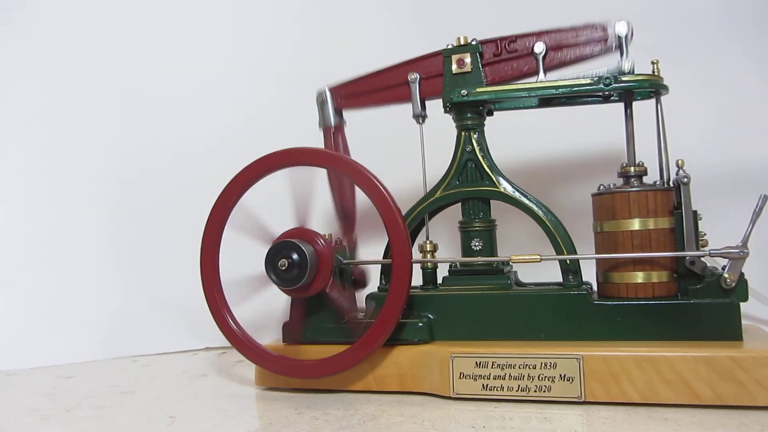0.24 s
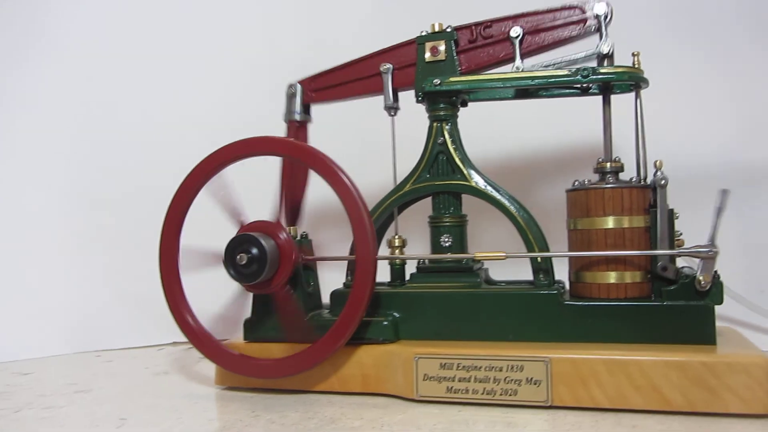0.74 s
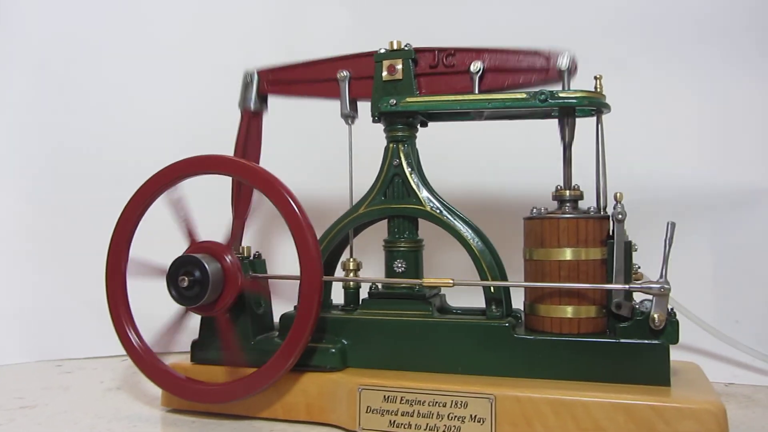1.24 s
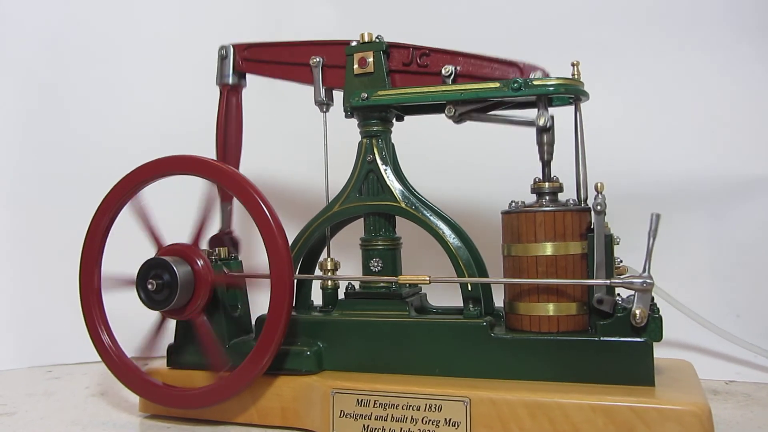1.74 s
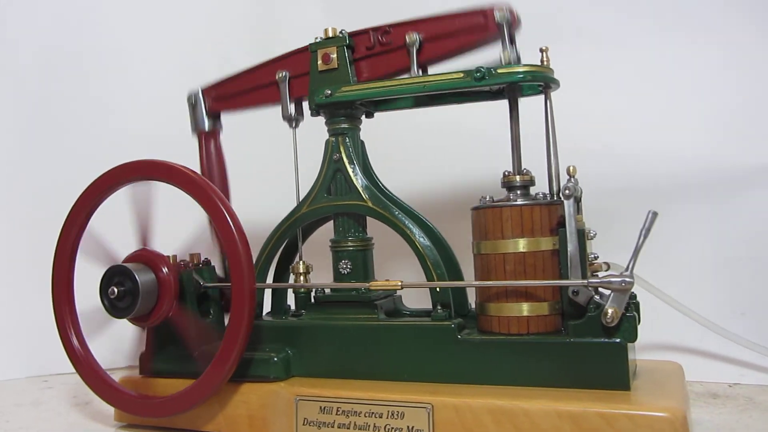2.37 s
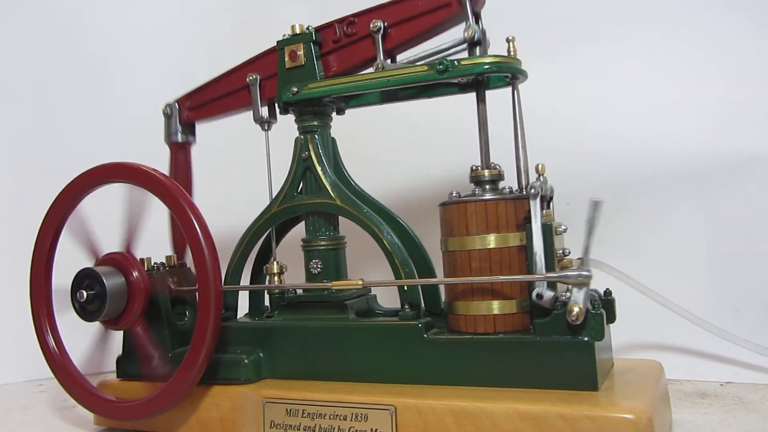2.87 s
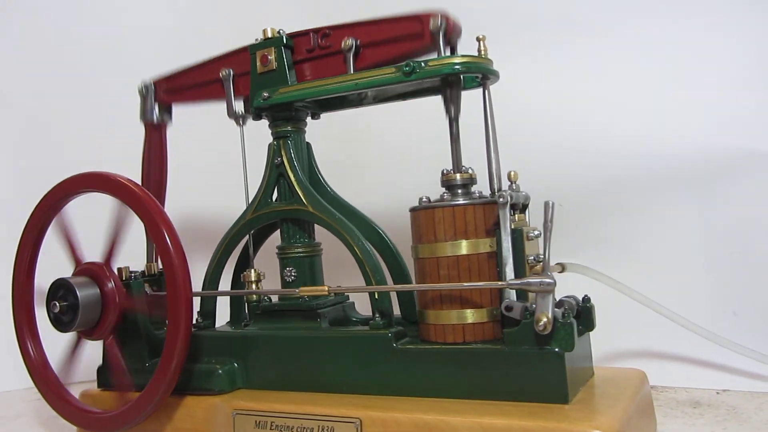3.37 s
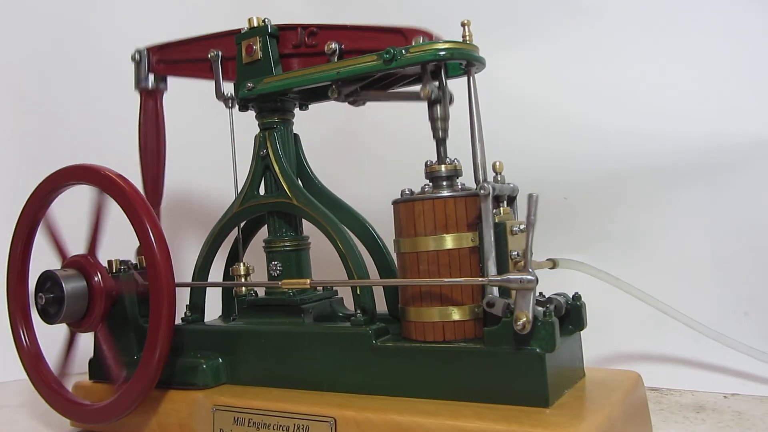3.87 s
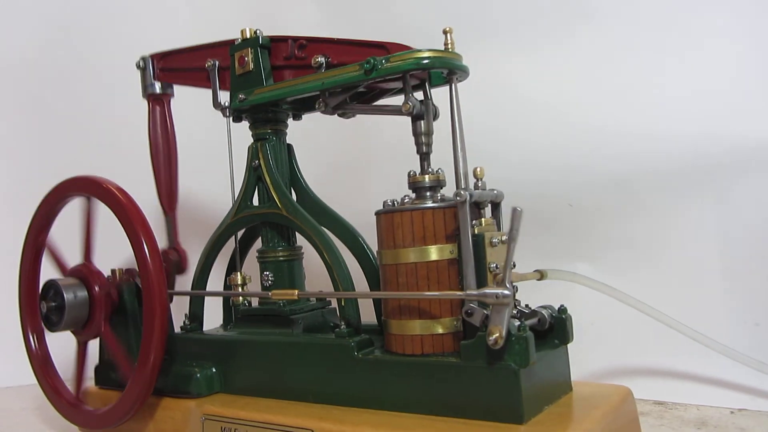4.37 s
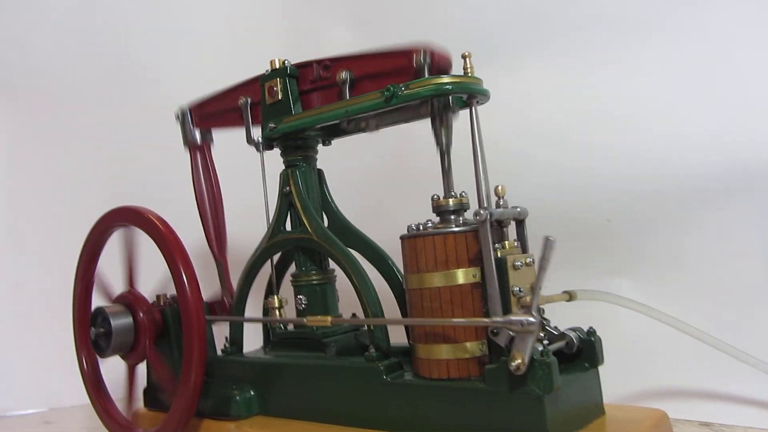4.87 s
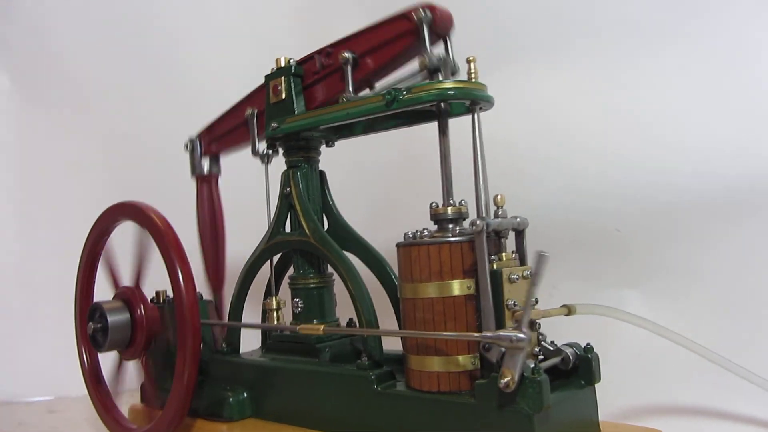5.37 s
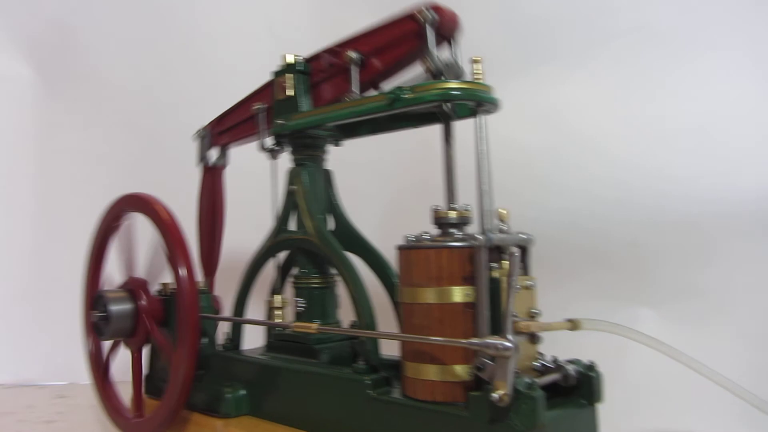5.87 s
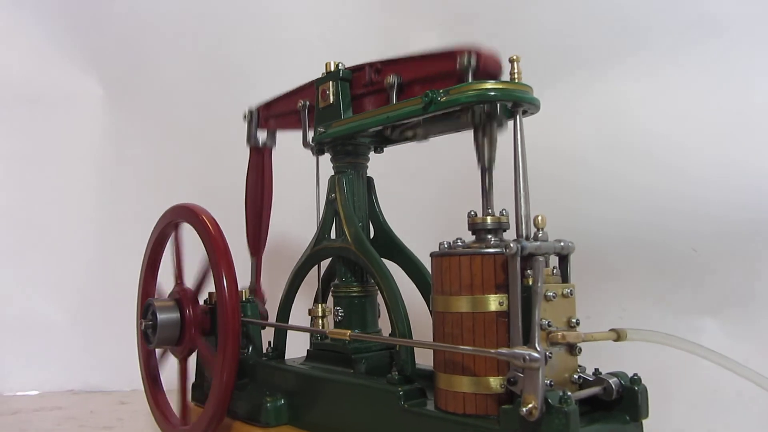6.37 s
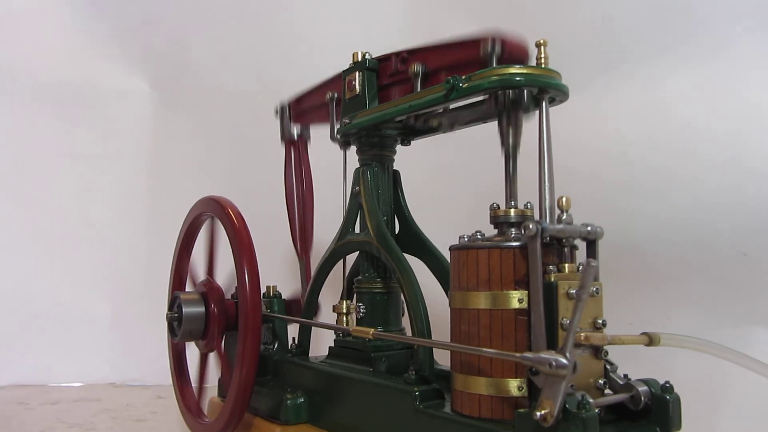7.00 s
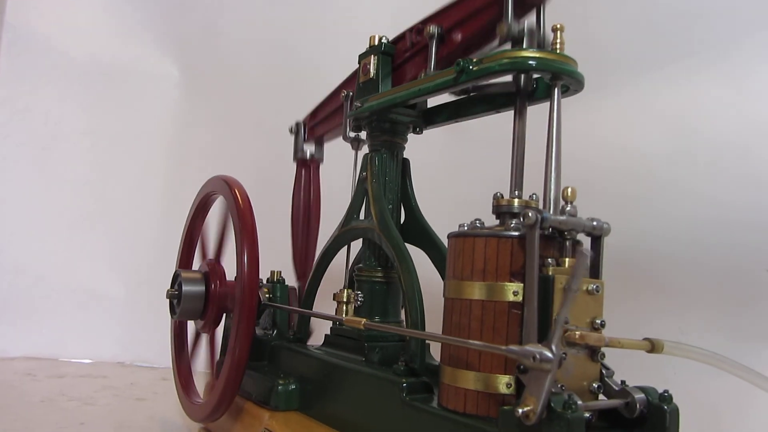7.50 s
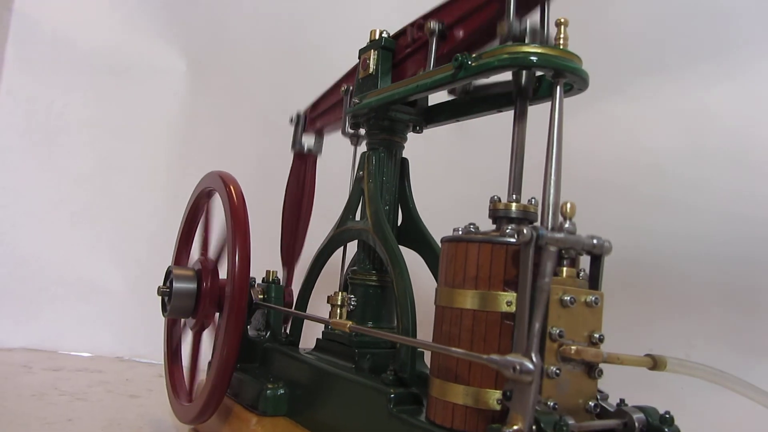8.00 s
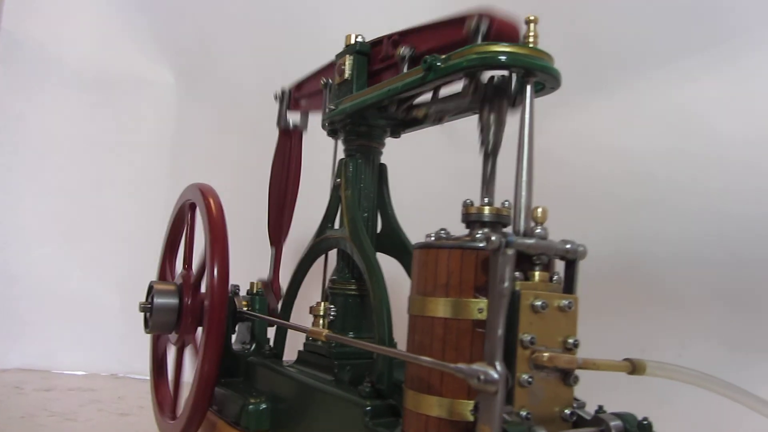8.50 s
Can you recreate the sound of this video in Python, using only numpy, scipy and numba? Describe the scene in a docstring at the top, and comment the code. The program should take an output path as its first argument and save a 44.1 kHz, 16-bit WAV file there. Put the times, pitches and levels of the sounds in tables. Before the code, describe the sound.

Fast, even pairs of sputtering steam-like puffs from a tabletop engine, with light clunks, low rumble and a faint hum in a small room.

```python
"""The exhaust of a model beam engine leads, right of centre: each turn gives a wet, gurgling puff and a
dry hiss, made of sputtering noise, a resonant pipe, a leak and spits. Bearing knocks strike damped modes
of the iron frame and the booming plinth. Under them lie rolling rumble, a faint hum and room noise.
The engine stands on a table in a small room; the stereo microphone creeps nearer, from the front round
to the cylinder end."""
import sys
import numpy as np
from scipy import signal
from scipy.fft import rfft, irfft, next_fast_len
from scipy.io import wavfile
from scipy.ndimage import map_coordinates
from numba import njit

SR = 44100
rng = np.random.default_rng(int(sys.argv[2]) if len(sys.argv) > 2 else 0)


def wav_record(signal):
    """Record a signal, one row per channel, as 16-bit PCM in the file named by sys.argv[1]."""
    frames = np.transpose(np.atleast_2d(signal))
    bounded = np.clip(frames, -1, 1)
    # unit amplitude maps onto the largest positive 16-bit level
    quanta = np.round(bounded * 32767).astype(np.int16)
    wavfile.write(sys.argv[1], SR, quanta)


N = 385434
T = np.arange(N) / SR  # t/s

# Colour of the wet jet, the dry jet and the leak: f/Hz, relative spectral level/dB
WET_HISS = [(500, -19.5), (1100, -20.5), (1600, -10.5), (2100, -3.5), (2950, 0.5), (3600, -5), (5000, -0.5),
            (6200, -1), (8500, -1), (10200, -5.5), (12700, -13.5), (14600, -6.5), (16000, -14)]
DRY_HISS = [(500, -32), (1100, -25), (1600, -11), (2050, -8), (2450, -17.5), (2950, -4.5), (3600, -7.5),
            (5000, -4), (6600, 0), (8600, -2.5), (10500, -7), (12600, -16), (14700, -8), (16000, -17)]
LEAK = [(700, -6), (1500, -15), (2700, -3), (3900, -16), (5500, -4.5), (8500, 2.5), (10500, 0.5),
        (12700, -5), (14500, -7), (16000, -18)]
# Flow out of each end of the cylinder, and the drive of the pipe on each puff:
# opening t/s into the turn, attack/s, open time/s, first burst/dB, sag by closing/dB, release/(dB per s)
WET_PUFF = (0.00074, .035, 0.14, 2.63, 1.4, 404)
DRY_PUFF = (0.19, 0.036, 0.16, 0.53, 10.1, 340)
GURGLE_PUFF = (0.01, 0.07, 0.1053, 0.2, 2.2, 413)
DRY_RING_PUFF = (0.19, 0.016, 0.14, .5, .5, 440)
BURST_S = 0.019  # time constant of the first burst, whose level in dB falls to 1/e
# Condensate rings the pipe at a pitch that shoots up as the valve opens, then sinks
GURGLE_START_HZ, GURGLE_TOP_HZ, GURGLE_RISE_S, GURGLE_SINK_HZ_PER_S = 1290, 2795, 0.04, 5000
DRY_RING_HZ, DRY_RING_DB = 2610, -11.5  # the dry puff rings it round one pitch, driven less hard
LEAK_SWING_DB, LEAK_PEAK_S = 3, .21  # the valve leaks most halfway through the turn
# The valve spits as it opens the wet port and as it shuts each port: t/s into the turn, level/dB
VALVE_SPITS = [(.001, -32.5), (.161, -30), (.361, -34.5)]

# Hiss as the engine shades its outlet, from the front and from the cylinder end: f/Hz, level/dB
FROM_FRONT = [(300, -21), (1100, 4.5), (1500, 5), (2050, 0.5), (2500, -0.5), (3000, -1.5), (3600, -0.5),
              (4400, -2), (5800, 2.5), (9300, 2), (16500, -5.5)]
FROM_END = [(300, 8), (1100, 0.5), (1650, -3.5), (2120, 3.5), (2500, -7.5), (2950, 0.5), (3600, -0.5),
            (4300, 1), (5150, 3), (5700, -0.5), (6500, 1), (8300, 3), (9300, -0.5), (16500, -1)]
# Colour the hiss gains where the outlet beams at the microphone: f/Hz, level/dB
ON_AXIS = [(300, -6), (1500, .5), (2000, -1.5), (2800, 3), (3600, -2), (4400, 2.5), (5000, 1.5),
           (6100, 3.5), (7500, 0.1), (10000, -.5), (16500, -2.5)]
# The beam: angle and width (0-1 as in MIC_PATH), then gurgle and highest treble added on the axis
BEAM_ANGLE, BEAM_WIDTH, BEAM_GURGLE_DB, BEAM_TREBLE_DB = .43, 0.25, 3.5, 5.5
# Path of the microphone: t/s, nearness (0 far - 1 close), angle (0 front - 1 cylinder end)
MIC_PATH = [(0, .02, 0.025), (2.2, 0.37, 0.087), (3.9, 0.66, 0.45), (5.6, 0.76, 0.74), (7.2, 1, 0.86),
            (8.7, 1, 1)]
# Place of the exhaust between the two ports of the microphone: t/s, left minus right level/dB
EXHAUST_PAN = [(0.0, -7), (0.68, -6), (3.03, -7.0), (5.43, -4.5), (8.53, -6), (8.63, -3.0), (8.7, -5.5)]

# Turns of the flywheel, nearly even, then a little quicker: t/s, length of a turn/s
TURN_LENGTH = [(3.5, .426), (6.9, .425), (7.7, .423)]
FIRST_TURN_S = -.267
# Slack taken up in the bearings: t/s into the turn, frame level/dB, plinth level/dB, contact/s
BLOWS = [(.002, -1, -12, 0.00064), (.010, -6.5, -3.5, .001), (0.131, -3, -10, .0012),
         (.195, -20, -19, 0.0011), (.364, -12, -14, 0.00055), (.408, -9, -10.5, 0.0021)]
# Modes of the iron frame and of the wooden plinth: f/Hz, level/dB, t60/s
FRAME = [(296, -8, 0.048), (381, 4, 0.015), (431, -0.5, 0.044), (534, -4, 0.057), (662, -23, .02),
         (920, 1.5, 0.019), (1159, 7, 0.015), (1390, -4, 0.022), (1900, -5, 0.017)]
PLINTH = [(99, -14, .36), (140, -13, .43), (154, 0, .43), (166.5, 0, .58)]
# Shaft rolling in its bearings and the still room, then the backdrop: f/Hz, relative spectral level/dB
RUMBLE = [(25, -24), (45, -33), (72, -5.5), (98, 0.5), (122, -7.5), (158, 4.5), (215, -7), (290, -2.5),
          (370, -9), (520, -7), (740, -13), (1200, -15), (2500, -15)]
AMBIENCE = [(25, -16), (70, 0.5), (170, -2), (300, -5.5), (600, -17), (800, -7.5), (1100, -14.5),
            (1450, -6.5), (2500, -7.5), (16000, -12)]

# Steam levels (far, close), before the mix of direct sound and echoes
WET_DB, DRY_DB = (-25.5, -21.5), (-22, -18.5)
GURGLE_DB, LEAK_DB = (-28.5, -26.5), (-40, -36)
# Machine levels (far, close)
KNOCK_DB, BOOM_DB, RUMBLE_DB = (-39, -31.5), (-38, -26.5), (-47, -40.5)
# What changes with the angle (from the front, from the cylinder end)
HUM_DB, OVERTONE_DB, TREBLE_DB = (-52.5, -55), (-53, -58.5), (-3, 0.5)
PORT_LAG_MS = (0.068, 0.031)
BOUNCE_MS, BOUNCE_DB = (0.88, 0.727), (-18, -18)
HUM_HZ = 447.6
TOP_HZ = 15800


def exhaust(age, near, on_axis):
    """Two jets of steam a turn, the ringing pipe and the leak, all louder with the microphone close."""
    wet = colour(sputter(age, rate=220, repeat_db=-0.5, chance_db=0.8), WET_HISS)
    wet = wet * flow(age, WET_PUFF) * undb(between(WET_DB, near))
    dry = colour(sputter(age, rate=180, repeat_db=0.0, chance_db=1.0), DRY_HISS)
    dry = dry * flow(age, DRY_PUFF) * undb(between(DRY_DB, near))
    return wet + dry + gurgle(age, near, on_axis) + leak(age, near)


def flow(age, puff):
    """One puff: the valve opens on a burst, the pressure sags ever faster, the valve shuts."""
    opens, attack, length, burst_db, sag_db, release = puff
    t = np.maximum(age - opens, 0)
    burst = burst_db * np.exp(-np.maximum(t - attack, 0) / BURST_S)
    sag = sag_db * np.minimum(t / length, 1) ** 2
    closing = release * np.maximum(t - length, 0)
    return np.minimum(t / attack, 1) * undb(burst - sag - closing)


def sputter(age, rate, repeat_db, chance_db):
    """A jet broken up by droplets: partly the same on every turn, partly new."""
    repeated = np.interp(age, T, walk(rate))
    return noise() * undb(repeat_db * repeated + chance_db * walk(2 * rate))


def gurgle(age, near, on_axis):
    """Condensate in the pipe resonates: pitch rises and sinks on the wet puff, hovers on the dry one."""
    rising = between((GURGLE_START_HZ, GURGLE_TOP_HZ), np.minimum(age / GURGLE_RISE_S, 1))
    sinking = rising - GURGLE_SINK_HZ_PER_S * np.maximum(age - GURGLE_RISE_S, 0)
    hz = np.where(age < DRY_RING_PUFF[0], sinking, DRY_RING_HZ)
    hz = hz * np.exp(.05 * walk(100))  # the pitch wavers
    pipe = sputter(age, rate=180, repeat_db=-0.3, chance_db=1.5)
    for _ in range(2):
        pipe = resonate(pipe, hz, 800.)
    drive = flow(age, GURGLE_PUFF) + undb(DRY_RING_DB) * flow(age, DRY_RING_PUFF)
    return unit(pipe) * drive * undb(between(GURGLE_DB, near) + BEAM_GURGLE_DB * on_axis)


def leak(age, near):
    """Steam seeping past the valve: steady noise that swells and ebbs once a turn."""
    swing = np.cos(2 * np.pi * (age - LEAK_PEAK_S) / curve(TURN_LENGTH, T)[0])
    return colour(noise(), LEAK) * undb(between(LEAK_DB, near) + LEAK_SWING_DB * swing)


def spits(age, near, per_s, level_db):
    """Droplets burst at the outlet, loudest while the flow is strong."""
    both = flow(age, WET_PUFF) + flow(age, DRY_PUFF)
    bursts = (rng.random(N) < per_s / SR) * rng.uniform(0.68, 1, N)
    envelope = signal.lfilter([1], [1, -np.exp(-1 / (0.0014 * SR))], bursts)  # 1.4 ms decay
    return colour(envelope * noise(), DRY_HISS) * both * undb(between(DRY_DB, near) + level_db)


def valve_spits(age, hz, width_hz, decay_s):
    """A short spit rings the pipe as the valve snaps over."""
    envelope = np.zeros(N)
    for at, db in VALVE_SPITS:
        envelope += undb(db) * (age > at) * np.exp(-np.abs(age - at) / decay_s)
    return unit(resonate(noise(), np.full(N, float(hz)), float(width_hz))) * envelope


def toward_microphone(steam, angle, on_axis):
    """The hiss changes colour as the microphone moves round the shading engine and through the beam."""
    steam = (1 - angle) * shape(steam, FROM_FRONT) + angle * shape(steam, FROM_END)
    steam = between((steam, shape(steam, ON_AXIS)), on_axis)
    # the jet beams its highest treble
    treble_db = between(TREBLE_DB, angle) + BEAM_TREBLE_DB * on_axis
    steam = steam + (undb(treble_db) - 1) * shape(steam, [(8500, -60), (11500, 0), (17000, 0)])
    # the bounce off the table combs the upper hiss
    bounce = shape(steam, [(3500, -14), (6000, 0), (7600, 0), (9000, -6), (16000, -8)])
    return steam + undb(between(BOUNCE_DB, angle)) * delayed(bounce, between(BOUNCE_MS, angle))


def turn_starts():
    """The moment at which each turn of the flywheel begins."""
    starts = [FIRST_TURN_S]
    while starts[-1] < T[-1]:
        starts.append(starts[-1] + curve(TURN_LENGTH, starts[-1])[0])
    return np.array(starts)


def crank():
    """Seconds into the current turn."""
    starts = turn_starts()
    return T - starts[np.searchsorted(starts, T, side="right") - 1]


def knocks(near, scatter_db, jitter_s):
    """Each reversal of load strikes the iron frame and rocks the plinth: half-sine pushes drive modes."""
    on_frame, on_plinth = np.zeros(N), np.zeros(N)
    for start in turn_starts():
        for after, frame_db, plinth_db, contact in BLOWS:
            late, size = rng.standard_normal(2)
            at = start + after + jitter_s * late
            i = int(at * SR)
            if 0 <= i < N - SR // 100:
                span = slice(i, i + SR // 100)
                push = np.sin(np.pi * np.clip((T[span] - at) / contact, 0, 1))
                push = push / push.sum() * undb(scatter_db * size)
                on_frame[span] += push * undb(frame_db)
                on_plinth[span] += push * undb(plinth_db)
    knock = ring(on_frame, FRAME) * undb(between(KNOCK_DB, near ** 2))
    boom = ring(on_plinth, PLINTH) * undb(between(BOOM_DB, near))
    return knock + boom


def ring(force, modes):
    """Damped modes driven by a force; a unit blow gives rms 1 over its first 20 ms."""
    t = T[:SR // 2]
    response = np.zeros(len(t))
    for hz, db, t60 in modes:
        response += undb(db) * np.cos(2 * np.pi * hz * t) * undb(-60 * t / t60)
    return signal.fftconvolve(force, response / np.std(response[:SR // 50]))[:N]


def room(x, t60, treble_t60, onset, size=16384):
    """Dense echoes, different at each port and from block to block; treble has its own decay time."""
    t = T[:size]
    out, x = np.zeros((2, N + 4 * size)), np.pad(x, (size, 2 * size))
    fade = np.sin(np.pi * np.arange(2 * size) / (2 * size))  # blocks overlap by half
    for i in range(0, N + size, size):
        chance = rng.standard_normal((2, size))
        low = signal.lfilter([.3], [1, -.7], chance)
        tail = low * undb(-60 * t / t60) + (chance - low) * undb(-60 * t / treble_t60)
        tail *= t > onset
        tail /= np.linalg.norm(tail, axis=1, keepdims=True)
        block = x[i:i + 2 * size] * fade
        out[:, i:i + 3 * size - 1] += signal.fftconvolve([block], tail, axes=1)
    return out[:, size:size + N]


def rolling(near):
    """The shaft rolls in its bearings: low stereo noise with a fluttering level."""
    return spread(RUMBLE, side=1.0) * undb(between(RUMBLE_DB, near) + 2.0 * walk(22)) * pan(-1.5)


def hum(angle):
    """A faint, slightly wavering tone in the room, with a narrow band of noise an octave or so above."""
    tone = np.sqrt(2) * np.sin(2 * np.pi * np.cumsum(HUM_HZ + .5 * walk(2.99)) / SR)
    tone = tone * undb(between(HUM_DB, angle) + .6 * walk(2))
    overtone = colour(noise(), [(800, -19), (910, -1.5), (962, 1.0), (1010, -2.5), (1100, -22)])
    return tone + overtone * undb(between(OVERTONE_DB, angle))


def ambience():
    """The backdrop of the room: steady, wide stereo noise."""
    return spread(AMBIENCE, side=0.93) * undb(-40.0)


def spread(points, side):
    """Stereo noise: a shared part and a part that differs between the ports."""
    mid, difference = colour(noise(), points), side * colour(noise(), points)
    return unit(np.array([mid + difference, mid - difference]))


def pan(db):
    """Gains of the two ports for a left minus right level in dB."""
    gains = undb(np.array([db, -db]).reshape(2, -1) / 2)
    return gains / np.sqrt(np.mean(gains ** 2, axis=0))


def delayed(x, ms):
    """A signal heard over a path whose length changes."""
    return map_coordinates(x, [np.arange(N) - ms * SR / 1000], order=3)


@njit
def resonate(x, hz, width):
    """State-variable band-pass with a moving centre; width in Hz."""
    y, band, low = np.empty(len(x)), 0., 0.
    for i in range(len(x)):
        g, k = np.tan(np.pi * hz[i] / SR), width / hz[i]
        v = (band + g * (x[i] - low)) / (1 + g * (g + k))
        band, low, y[i] = 2 * v - band, low + 2 * g * v, k * v
    return y


def shape(x, points):
    """Filter a signal by (f/Hz, level/dB) points, falling steeply beyond the ends."""
    hz, db = np.transpose(points)
    size = next_fast_len(N)
    f = np.maximum(np.fft.rfftfreq(size, 1 / SR), 1)
    gain = undb(np.interp(np.log(f), np.log(hz), db))
    gain = gain * np.minimum(f / hz[0], 1) ** 2 * np.minimum(hz[-1] / f, 1) ** 2
    return irfft(rfft(x, size) * gain, size)[:N]


def colour(x, points):
    """Give a signal a spectrum, at rms 1."""
    return unit(shape(x, points))


def noise():
    """White noise."""
    return rng.standard_normal(N)


def walk(rate):
    """Smooth chance of rms 1, changing `rate` times a second."""
    return unit(np.interp(T * rate, np.arange(N), noise()))


def unit(x):
    """Scale to rms 1."""
    return x / np.sqrt(np.mean(x ** 2))


def undb(db):
    """Decibels to gain."""
    return 10 ** (np.asarray(db) / 20)


def curve(table, at):
    """The columns of a table, joined by straight lines."""
    x, *columns = np.transpose(table)
    return [np.interp(at, x, c) for c in columns]


def between(ends, share):
    """A value that goes from one end to the other as the share goes from 0 to 1."""
    return ends[0] + (ends[1] - ends[0]) * share


def scene():
    """Exhaust and machinery, right of centre, over the hum of the room."""
    age = crank()
    near, angle = np.clip(curve(MIC_PATH, T), 0, 1)
    on_axis = np.exp(-((angle - BEAM_ANGLE) / BEAM_WIDTH) ** 2)
    steam = exhaust(age, near, on_axis)
    steam = steam + spits(age, near, per_s=45, level_db=-14.5)
    steam = steam + valve_spits(age, hz=1860, width_hz=420, decay_s=0.0063)
    steam = toward_microphone(steam, angle, on_axis)
    # the left port hears the steam later
    direct = np.array([delayed(steam, between(PORT_LAG_MS, angle)), steam])
    # the casting and the backdrop scatter it within milliseconds, the room more slowly
    scatter = undb(-4) * room(steam, t60=.035, treble_t60=.035, onset=.0008, size=2048)
    walls = undb(-7) * room(steam, t60=.16, treble_t60=.13, onset=.007, size=4096)
    puffs = undb(-2.5) * (direct + scatter + walls) * pan(curve(EXHAUST_PAN, T)[0])
    body = knocks(near, scatter_db=1.6, jitter_s=.0002)
    body_echo = undb(-10) * room(body, t60=.2, treble_t60=.12, onset=.004)
    machine = (body + body_echo) * pan(-4.3)
    return puffs + machine + rolling(near) + hum(angle) * pan(-3.3) + ambience()


def record(dry):
    """The recorder cuts the deepest bass and the top."""
    dry = signal.sosfilt(signal.butter(3, 42, "high", fs=SR, output="sos"), dry)
    return signal.sosfilt(signal.ellip(10, .2, 80, TOP_HZ, fs=SR, output="sos"), dry)


dry = scene()
out = record(dry)
wav_record(out)
```